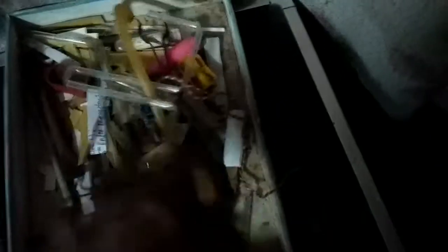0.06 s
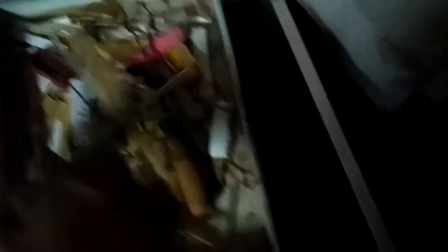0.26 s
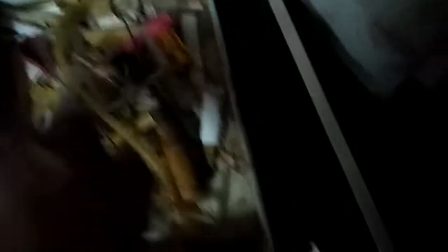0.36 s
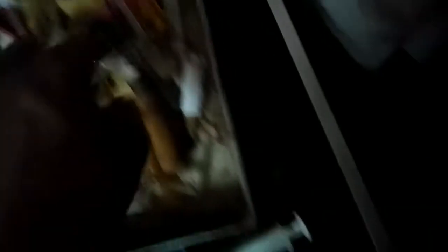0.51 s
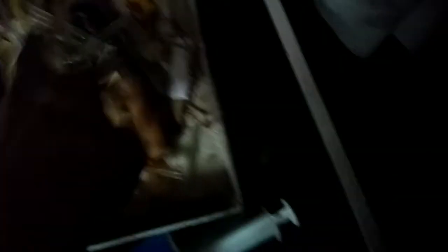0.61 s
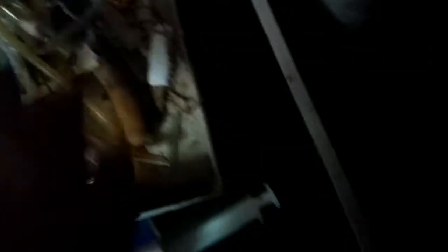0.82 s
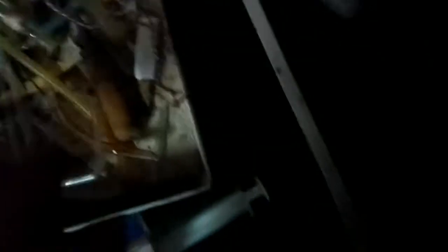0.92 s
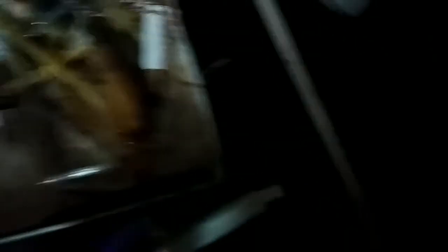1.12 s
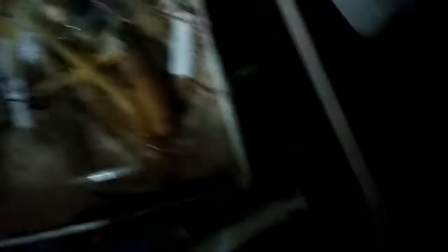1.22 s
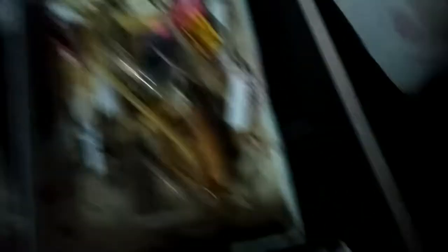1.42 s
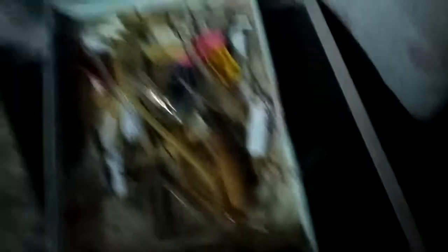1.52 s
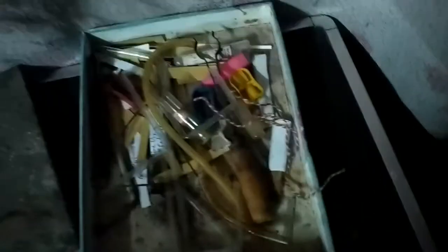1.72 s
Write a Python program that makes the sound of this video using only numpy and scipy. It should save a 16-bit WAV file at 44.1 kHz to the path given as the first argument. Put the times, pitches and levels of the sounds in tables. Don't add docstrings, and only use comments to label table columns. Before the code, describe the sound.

Close phone pickup of glass tubes rattling in a shallow box: a dense early burst with one loud ringing clink, lighter glass knocks, sparse dry taps, then hollow plastic bouncing, over faint indoor hum.

```python
import sys
import numpy as np
from scipy import signal
from scipy.fft import rfft, irfft
from scipy.io import wavfile
from scipy.ndimage import uniform_filter1d, minimum_filter1d

SR = 44100
rng = np.random.default_rng(int(sys.argv[2]) if len(sys.argv) > 2 else 0)


def transcribe(signal):
    frames = np.atleast_2d(signal).T
    limited = np.clip(frames, -1, 1)
    pcm = np.round(limited * 32767).astype(np.int16)
    wavfile.write(sys.argv[1], SR, pcm)


def attenuation_scalar(level_db):
    decades = np.asarray(level_db, float) / 20
    return 10 ** decades


N = 77175

# pitch in Hz, level in dB, time to fade by 60 dB in seconds.
BARREL_MODES = [(1430, -5, .03), (2600, -11, .025), (3750, -4, .025), (4280, -4, .03), (5200, -7, .025),
                (8300, -4, .025), (9150, -2, .035)]
LOOSE_GLASS_HZ = [2080, 3865, 4850, 7200, 9500, 10550, 11700, 14400]


def colour(x, points):
    hz, db = np.array(points).T
    f = np.maximum(np.arange(len(x) // 2 + 1) * SR / len(x), 1)
    gain = attenuation_scalar(np.interp(np.log(f), np.log(hz), db))
    return irfft(rfft(x) * gain, len(x))


def unit(x):
    return x / np.sqrt(np.mean(x ** 2))


def fade(t60, seconds=0.19):
    t = np.arange(int(seconds * SR)) / SR
    return t, np.exp(-np.log(1000) * t / np.clip(t60, .002, 1))


def add(out, start_s, peak_db, sound):
    i = int(max(start_s, 0) * SR)
    sound = sound[:N - i] / np.abs(sound).max()
    out[i:i + len(sound)] += attenuation_scalar(peak_db) * sound


def walk(rate):
    k = int(SR / rate)
    steps = np.repeat(rng.standard_normal(N // k + 1), k)
    return uniform_filter1d(uniform_filter1d(steps, k), k)[:N]


def crack():
    # pitch in Hz, level in dB.
    crack_tone = [(1000, -29.5), (2500, -20), (6000, -8.5), (11000, -0.5), (16000, -6.5)]
    t, burst_env = fade(.013)
    clatter_env = attenuation_scalar(-20) * fade(.06)[1]
    burst = rng.standard_normal(len(t)) * (burst_env + clatter_env)
    burst = signal.sosfilt(signal.butter(2, 1500, "high", fs=SR, output="sos"), burst)
    return colour(np.roll(burst, 64), crack_tone)[64:]


def struck(modes, hits, scatter_db, detune, rough, rise_s):
    choked_db = -22
    out = np.zeros(N)
    hz, db, t60 = np.array(modes).T[:, :, None]
    for start_s, peak_db, ring_db, share, choke_s in hits:
        t, env = fade(np.minimum(t60, .15) * share)
        level_luck, pitch_luck = rng.standard_normal((2, len(modes), 1))
        chatter = 1 + rough * uniform_filter1d(rng.standard_normal(env.shape), size=130, axis=1)
        tones = np.sin(2 * np.pi * hz * (1 + detune * pitch_luck) * t)
        ring = (attenuation_scalar(db + scatter_db * level_luck) * env * chatter * tones).sum(0)
        choke = np.exp(-(t / choke_s) ** 3) + attenuation_scalar(choked_db)
        ring = (attenuation_scalar(ring_db) * ring * choke)[64:]
        rise = np.minimum(t[:-64] / rise_s, 1)
        add(out, start_s, peak_db, (crack() + ring) * rise)
    return out


def glass(modes, hits):
    return struck(modes, hits, scatter_db=2.5, detune=.0005, rough=.8, rise_s=.0003)


def long_tube():
    # pitch in Hz, level in dB, time to fade by 60 dB in seconds.
    long_modes = [(5819, -21, .3), (6331, -17, .087), (7397, -13, .06), (8236, 0, .096), (9001, -5, .07),
                  (10640, -4, .05), (11985, -1, .035), (9230, -9, .08), (14395, -1, .094),
                  (15460, -11, .078)]
    # start in seconds, peak in dB, ring over crack in dB, share of the full ring length,
    # time until choked in seconds.
    long_hits = [
        (0.397, -2.5, -15.5, 1.15, 0.059),
        (0.4793, -25, -4, 0.57, 0.021),
    ]
    return glass(long_modes, long_hits)


def thin_tube():
    # pitch in Hz, level in dB, time to fade by 60 dB in seconds.
    thin_modes = [(3865, -22, .13), (7424, -18, .04), (9010, 0, .062), (13635, -10, .07), (14200, -11, .04),
                  (15135, -11, .046)]
    # start in seconds, peak in dB, ring over crack in dB, share of the full ring length,
    # time until choked in seconds.
    thin_hits = [
        (0.2993, -17.5, 6.5, 3.5, .02),
        (0.35, -15, -4, 1.6, .026),
        (0.3927, -20.5, -5.5, 0.66, .05),
    ]
    return glass(thin_modes, thin_hits)


def short_tube():
    # pitch in Hz, level in dB, time to fade by 60 dB in seconds.
    short_modes = [(3728, -19, .06), (5820, -16, .06), (6358, -15, .051), (7098, -13, .071),
                   (8250, 0, .075), (10075, -5, .06), (13490, -11, .06), (13650, -9, .06),
                   (15115, -10, .06)]
    # start in seconds, peak in dB, ring over crack in dB, share of the full ring length,
    # time until choked in seconds.
    short_hits = [
        (0.685, -34, -3.5, 0.52, 0.018),
        (.731, -19, -11.5, 0.96, 0.058),
        (0.8175, -24.5, -2, 1.53, 0.026),
    ]
    return glass(short_modes, short_hits)


def bouncing_barrel():
    # start in seconds, peak in dB, ring over crack in dB.
    bounces = [(1.4754, -23, -1), (1.4995, -32, 8), (1.5153, -37.5, 23), (1.5264, -44, 14),
               (1.554, -51, 23), (1.564, -39, 9), (1.6696, -37.5, 2), (1.683, -34, 7), (1.6951, -33, 15),
               (1.729, -36, 9), (1.7414, -31, 3)]
    hits = [(*bounce, .8, .08) for bounce in bounces]
    return struck(BARREL_MODES, hits, scatter_db=0.5, detune=0.0148, rough=4.1, rise_s=0.0018)


def bits(events, crack_db, spread=0., count=0, near_db=-4, near_hz=()):
    out = np.zeros(N)
    for start_s, peak_db, hz, t60 in events:
        t, env = fade(t60)
        neighbours = hz * np.exp(spread * rng.standard_normal(count)) if count else near_hz
        f = np.append(hz, neighbours)[:, None]
        db = near_db - 7 * np.abs(rng.standard_normal(f.shape))
        db[0] = 0
        tones = attenuation_scalar(db) * np.sin(2 * np.pi * f * t)
        band = [hz / 1.133, min(hz * 1.27, .45 * SR)]
        rub = signal.lfilter(*signal.butter(2, band, "band", fs=SR), rng.standard_normal(len(t)))
        rise = np.minimum(t * hz / 2, 1)
        add(out, start_s, peak_db, env * rise * (tones.sum(0) + attenuation_scalar(crack_db) * unit(rub)))
    return out


def ticks():
    # start in seconds, peak in dB, pitch in Hz, time to fade by 60 dB in seconds.
    tick_events = [
        (.0074, -52, 6700, 0.043),
        (.033, -44, 7000, 0.046),
        (.0707, -41.5, 7790, 0.057),
        (.179, -23.5, 7270, 0.014),
        (.2084, -31, 4920, 0.03),
        (.2344, -27, 7000, 0.038),
        (.249, -21, 10600, 0.083),
    ]
    return bits(tick_events, crack_db=0, near_hz=LOOSE_GLASS_HZ[1:])


def taps():
    # start in seconds, peak in dB, pitch in Hz, time to fade by 60 dB in seconds.
    tap_events = [
        (.6534, -50, 7690, .035),
        (1.071, -49, 3250, .03),
        (1.1155, -40, 12400, .012),
        (1.1503, -32, 9000, .008),
        (1.154, -34, 12000, .008),
        (1.158, -38, 6500, .012),
        (1.2262, -16, 6000, .007),
        (1.2324, -32, 5800, .012),
        (1.4924, -35, 12000, .03),
    ]
    dry_pitches = [5200, 6500, 7400, 8600, 9800, 11700, 14000]
    return bits(tap_events, crack_db=2.5, near_db=-0.5, near_hz=dry_pitches)


def knocks():
    # start in seconds, peak in dB, pitch in Hz, time to fade by 60 dB in seconds.
    knock_events = [
        (.123, -52, 2253, 0.044),
        (.24, -29, 2270, 0.037),
        (.317, -31.5, 1965, 0.052),
        (.396, -29.5, 1612, 0.017),
        (.417, -39.5, 2087, 0.035),
        (.772, -40, 2310, 0.025),
        (1.126, -49.5, 1326, 0.078),
        (1.237, -41.5, 1340, 0.028),
        (1.37, -54, 1298, 0.083),
    ]
    return bits(knock_events, crack_db=-1.5, spread=0.14, count=3)


def thuds():
    # start in seconds, peak in dB, pitch in Hz.
    floor_events = [
        (.178, -57, 370),
        (.25, -47, 330),
        (.417, -49, 220),
        (.735, -61, 160),
        (1.095, -56, 175),
    ]
    events = [(*event, .07) for event in floor_events]
    return bits(events, crack_db=-4.5, spread=0.3, count=2)


def pings():
    # start in seconds, peak in dB, pitch in Hz, time to fade by 60 dB in seconds.
    ping_events = [(.035, -69.5, 379, 0.055), (.11, -55.5, 5380, .03), (.112, -65, 3760, .04),
                   (.169, -36.5, 9600, .02), (.2, -51.5, 393, .12), (.262, -44, 393.3, .12),
                   (.335, -57.5, 400, .1), (.399, -50.5, 380, .05), (.186, -29.5, 7080, .03),
                   (.186, -35, 9660, 0.054), (.199, -28, 4910, 0.017), (.201, -28, 8000, 0.013),
                   (.217, -25.5, 9740, 0.017), (.245, -41, 3810, 0.36), (.254, -37, 12300, .04),
                   (.282, -34, 6600, .02), (.283, -34, 2044, .06), (.29, -33, 14300, 0.035),
                   (.295, -57, 221, .05), (.308, -33, 13040, .05), (.328, -32, 9110, .03),
                   (.332, -28, 7400, .04), (.355, -30, 14570, 0.046), (.373, -36.5, 2069, 0.027),
                   (.386, -41, 2160, 0.018), (.426, -35.5, 4850, 0.022), (.481, -36.5, 6420, 0.038),
                   (.482, -67.5, 301, .04), (.489, -47, 13420, 0.066), (.677, -44.5, 9000, 0.017),
                   (.685, -55.5, 1075, 0.046), (.686, -39.5, 4760, 0.031), (.688, -64, 430, 0.064),
                   (.772, -61.5, 445, 0.064), (.808, -54, 9010, .012), (.82, -62, 433, 0.061),
                   (.83, -60.5, 5800, 0.29), (1.229, -36.5, 1626, 0.013), (1.238, -34, 5540, 0.013),
                   (1.235, -49.5, 545, .08), (1.388, -50, 8700, .02), (1.476, -32, 4980, 0.04),
                   (1.477, -36.5, 3370, 0.02), (1.54, -43.5, 3550, 0.026), (1.555, -55, 710, 0.038),
                   (1.602, -52, 1430, .03), (1.602, -53.5, 5390, 0.021), (1.617, -52.5, 1484, .04),
                   (1.73, -37, 2600, 0.039)]
    return bits(ping_events, crack_db=-6, spread=0.046, count=1)


def resonate(x, hz, t60):
    r = np.exp(-np.log(1000) / (t60 * SR))
    return unit(signal.lfilter([1, 0, -1], [1, -2 * r * np.cos(2 * np.pi * hz / SR), r * r], x))


def stirred(push, pitches, levels, t60):
    out = 0
    for hz, db in zip(pitches, levels):
        drive = push * attenuation_scalar(9.8 * walk(30)) * rng.standard_normal(N)
        out = out + attenuation_scalar(db) * resonate(drive, hz, t60)
    return out


def rustle():
    # time in seconds, level in dB, tilt in dB per octave.
    hand_stirs = [
        [(0, -50, 4.5), (.045, -71, 3.5), (.07, -90.5, -6)],
        [(.15, -73, 3.5), (.185, -33.5, 2), (.228, -43.5, 0), (.256, -38.5, -6), (.276, -49, 0), (.286, -33, 4),
         (.322, -40.5, 2), (.355, -32, 7.5), (.388, -43.5, 6.5), (.41, -39.5, -1.5), (.435, -43.5, 1)],
        [(.45, -66.5, -4), (.475, -67.5, -1), (.49, -53, 3.5), (.505, -72, 4), (.6, -97.5, 2)],
        [(.645, -85.5, 12), (.675, -65.5, 2.5), (.69, -49, -1), (.722, -56.5, 3), (.74, -41.5, 4.5),
         (.775, -52, 4.5), (.8, -72, 0), (.822, -43.5, -0.5), (.865, -70, 2.5)],
        [(.97, -83, 5.5), (1.065, -99.5, 2.5), (1.075, -58.5, 0), (1.12, -58, -0.5), (1.165, -57.5, 0.5),
         (1.218, -76, 1), (1.24, -42, -5), (1.27, -72, -4), (1.3, -65, 2)],
        [(1.36, -73.5, 11.5), (1.385, -65, -5.5), (1.41, -77, 5.5), (1.468, -70.5, 1), (1.48, -45, -1),
         (1.57, -59, -3), (1.66, -67.5, 0.5), (1.69, -55, -4), (1.75, -46, -1.5)],
    ]
    # pitch in Hz, level in dB per Hz.
    scrap_tone = [(250, -32.5), (380, -13.5), (600, -10.5), (1100, -10), (2100, -3), (3000, -9.5),
                  (7000, -5.5), (12000, -7.5), (16000, -8.5)]
    loose_levels = [-8, -7.5, -13.5, 4, 0.5, -1, -10, 4.5]
    grains_per_s, grain_spread_db, grain_s, hiss_db = 800, 2, 0.002, -5.5
    scrap_t60_s = 0.0088
    glass_still_s, barrel_rolls_s = .47, 1.36

    s, db, tilt = np.vstack(hand_stirs).T
    t = np.arange(N) / SR
    db, tilt = np.interp(t, s, db), np.interp(t, s, tilt)
    strength = attenuation_scalar(grain_spread_db * np.clip(rng.standard_normal(N), -2, 2))
    touch = (rng.random(N) < grains_per_s / SR) * strength
    touch = unit(signal.lfilter([1], [1, -np.exp(-1 / (grain_s * SR))], touch)) + attenuation_scalar(hiss_db)

    hz_points, db_points = np.array(scrap_tone).T
    out = 0
    for hz in np.geomspace(260, 15800, num=44) * np.exp(.03 * rng.standard_normal(44)):
        own_db = np.interp(np.log(hz), np.log(hz_points), db_points) + 10 * np.log10(hz / 8000)
        band = resonate(touch * rng.standard_normal(N), hz, scrap_t60_s * (8000 / hz) ** .5)
        tilt_db = tilt * np.log2(max(hz, 1300) / 8000)
        out = out + band * attenuation_scalar(own_db + tilt_db + 4.06 * walk(40))
    bed = out * attenuation_scalar(db - 9.0)

    early, late, push = t < glass_still_s, t > barrel_rolls_s, touch * attenuation_scalar(db)
    loose = stirred(push * early, LOOSE_GLASS_HZ, loose_levels, .04)
    loose = loose * attenuation_scalar(-15.5) * np.std(bed * early)
    barrel_hz, barrel_db = np.array(BARREL_MODES).T[:2]
    rolling = stirred(push * late, barrel_hz, barrel_db, 0.0049)
    rolling = rolling * attenuation_scalar(-8) * np.std(bed * late)
    return bed + loose + rolling


def room_echo(near):
    t, env = fade(0.27, .6)
    wall_tone = [(100, -7), (2000, -11.5), (6000, 2.0), (16000, -2.5)]  # (Hz, dB)
    echo = colour(rng.standard_normal(len(t)), wall_tone) * env
    echo = echo / np.sqrt(np.sum(echo ** 2))
    return attenuation_scalar(-34.5) * signal.fftconvolve(near, echo)[:N]


def room_tone():
    # pitch in Hz, rms level in dB.
    hum_tones = [(79, -69), (157, -78.5)]
    # pitch in Hz, level in dB per Hz.
    air_tone = [(20, -20), (80, -5), (170, -8), (300, -21), (1000, -32.5), (16000, -59.5)]
    turn = 2 * np.pi * np.cumsum(1 + .012 * walk(4.1)) / SR
    hum = 0
    for k, (hz, db) in enumerate(hum_tones):
        hum = hum + attenuation_scalar(db + 1.1 * walk(9 + 6 * k)) * np.sqrt(2) * np.sin(hz * turn + k)
    return hum + attenuation_scalar(-77) * unit(colour(rng.standard_normal(N), air_tone))


def scene():
    near = long_tube() + thin_tube() + short_tube() + bouncing_barrel()
    near = near + ticks() + taps() + knocks() + thuds() + rustle() + pings()
    return (near + room_echo(near) + room_tone())[None]


def low_pass(x):
    return signal.sosfilt(signal.butter(12, 16800, fs=SR, output="sos"), x)


def record(dry):
    limit_db, release_s, top_hz = -22, .02, 16000
    hold = int(release_s * SR)
    held = -minimum_filter1d(-np.abs(dry), hold, axis=1, origin=hold // 2 - 1)
    bass = signal.sosfilt(signal.butter(2, 120, fs=SR, output="sos"), dry)
    duck = np.minimum(attenuation_scalar(limit_db) / (held + 1e-9), 1)
    duck = uniform_filter1d(duck, size=400, axis=1)
    top_cut = signal.ellip(8, .2, 60, top_hz, fs=SR, output="sos")
    mix = signal.sosfilt(top_cut, dry - bass * (1 - duck))
    return low_pass(mix)


dry = scene()
out = record(dry)
transcribe(out)
```